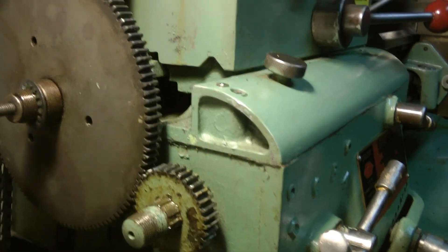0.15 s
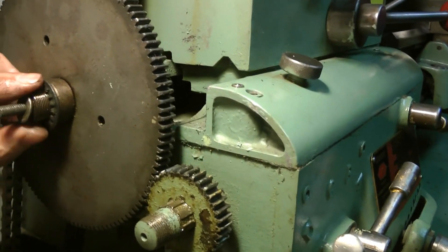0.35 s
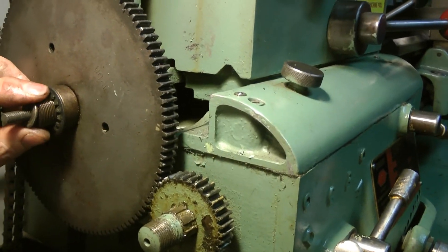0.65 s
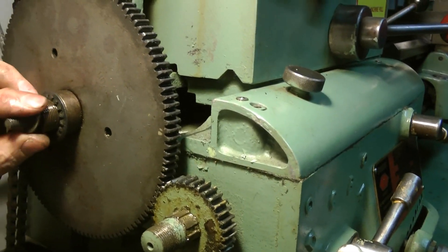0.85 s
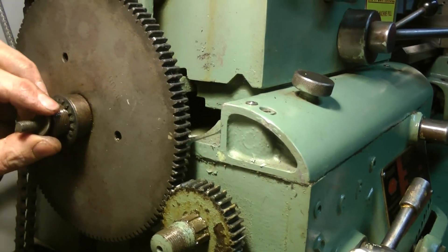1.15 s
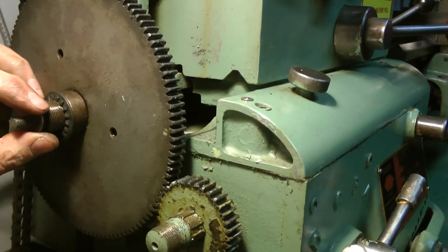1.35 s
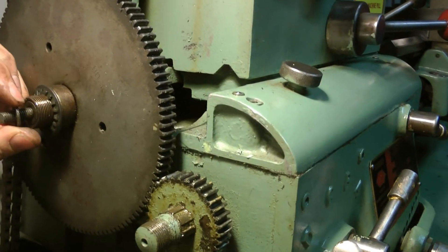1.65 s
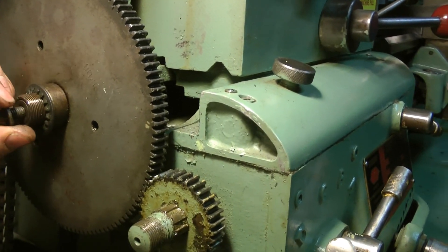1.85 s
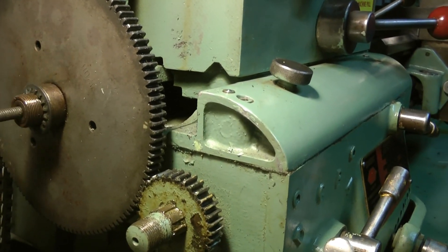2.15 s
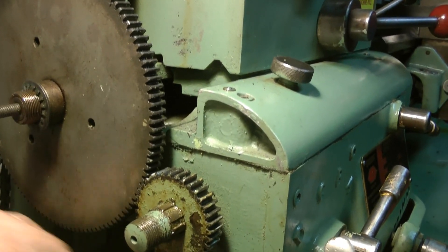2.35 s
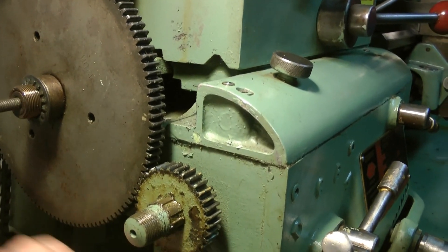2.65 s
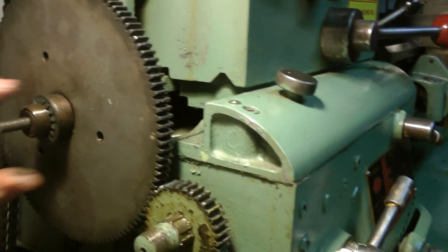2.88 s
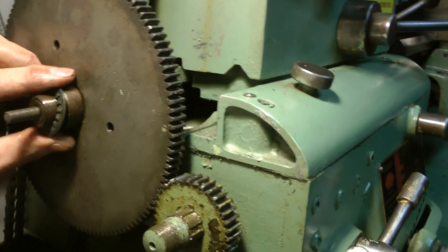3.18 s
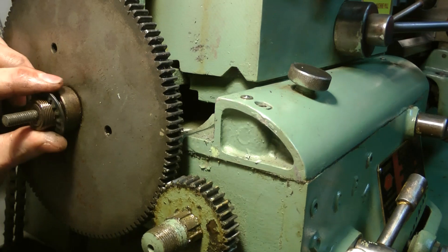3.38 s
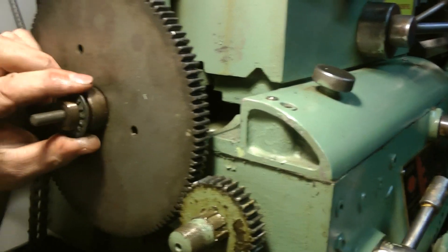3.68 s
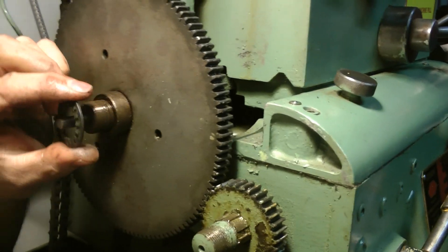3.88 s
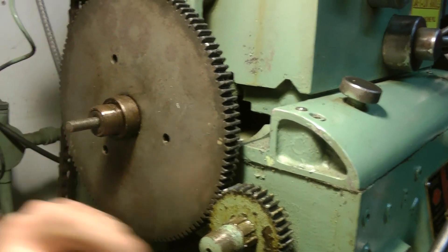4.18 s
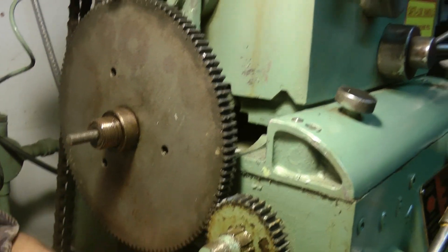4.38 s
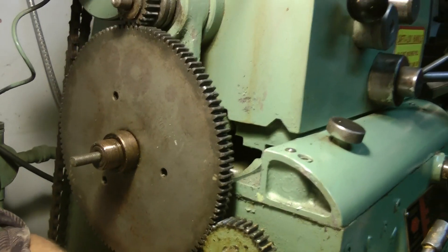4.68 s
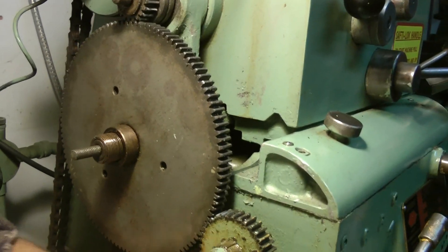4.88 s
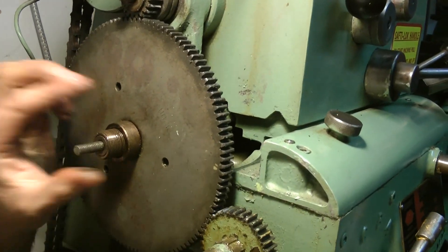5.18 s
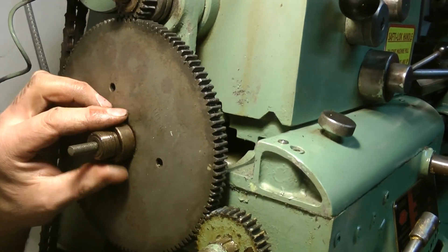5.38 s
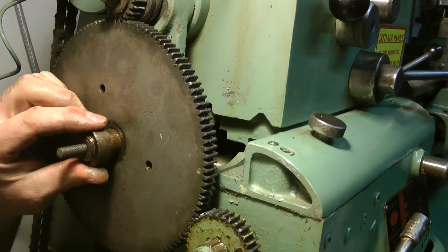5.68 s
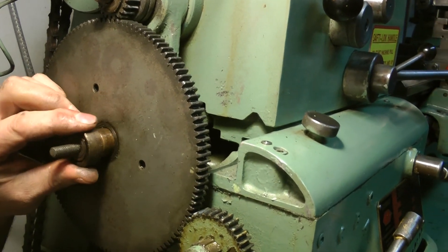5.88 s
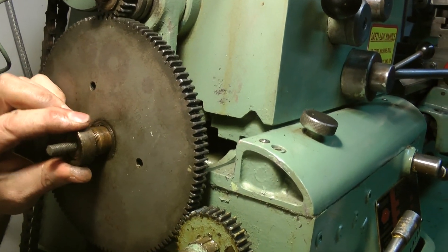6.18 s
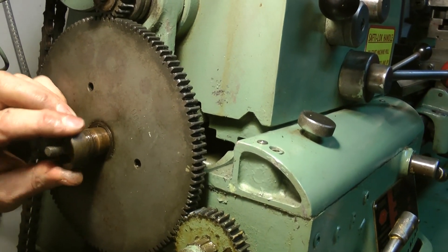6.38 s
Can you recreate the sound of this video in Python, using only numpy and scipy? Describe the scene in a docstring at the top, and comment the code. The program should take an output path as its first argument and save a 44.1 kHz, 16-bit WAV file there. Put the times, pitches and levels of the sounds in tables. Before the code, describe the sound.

A close stereo microphone, fuller on the right, hears metal handling in a small quiet workshop with short echoes and soft background hiss, slightly stronger from about 2.5 to 5.5 s. A crisp tick opens, then near quiet until a small click at 0.85 s. Dry clicks cluster at 1.6-1.7 and 2.0-2.1 s; a thuddy tap at 2.35 s leads to a bright, very high double clink at 2.7 s. From 3.0 to 3.8 s, irregular ticks and scratchy thread chatter. At 4.37 s a part lands with a low thump and mellow ring; sleeves brush and a low hum briefly swells around 4.6 s. A ring pings clearly at 4.74 s, with short clinks to 5.0 s. Light touches follow, then a loud harsh scrape at 5.65-5.8 s and heavy, dull metallic knocks at 5.85, 5.95, 6.05, 6.3 and 6.43 s, the wheel ringing faintly until the end at about 6.5 s.

```python
"""Metal ticks and scrapes as fingers work a nut, washer, lock ring and bush off the stud of a big gear wheel.
Ticks and scrapes are shaped noise bursts with hub modes; set-down parts and the wheel ring as decaying modes.
The machine body thuds in modes and filtered noise; uneven noise grains make the brush of skin and sleeves
and one loud scraping rub. A wavering low hum comes and goes over soft background noise; a small quiet
workshop adds noise-tail echoes. All is near a stereo microphone that favours its right side."""
import sys
import numpy as np
from scipy import signal
from scipy.fft import rfft, irfft
from scipy.io import wavfile
from scipy.ndimage import uniform_filter1d

SR = 44100
rng = np.random.default_rng(int(sys.argv[2]) if len(sys.argv) > 2 else 0)


def dump(signal):
    """Clip the signal to [-1, 1] and save it as 16-bit WAV at the path in sys.argv[1]."""
    limited = np.clip(np.atleast_2d(signal).T, -1, 1)
    pcm = np.round(limited * 32767).astype(np.int16)
    wavfile.write(sys.argv[1], SR, pcm)


N = 288425


def undb(db):
    """Decibels to amplitude gain."""
    return 10 ** (np.asarray(db) / 20)


def curve(table):
    """Join rows (time [s], value) by straight lines, one value per sample."""
    return np.interp(np.arange(N) / SR, *np.transpose(table))


def colour(x, table):
    """Filter by (frequency [Hz], gain [dB]) points, straight over log frequency."""
    hz, db = np.transpose(table)
    size = x.shape[-1]
    f_hz = np.maximum(np.arange(size // 2 + 1) * SR / size, 1)
    gain_db = np.interp(np.log(f_hz), np.log(hz), db)
    return irfft(rfft(x) * undb(gain_db), size)


def unit(x):
    """Scale to rms 1."""
    return x / np.sqrt(np.mean(x ** 2))


def add(track, time_s, sound):
    """Mix a sound into the track from time_s."""
    i = int(time_s * SR)
    track[i:i + len(sound)] += sound[:N - i]


def ring(modes, size, scatter_db, detune):
    """Decaying modes; every blow lands elsewhere, so strengths and pitches shift a little."""
    hz, db, t60_s = np.transpose(modes)[:, :, None]
    pitch_chance, level_chance = rng.standard_normal((len(modes), 2)).T[:, :, None]
    t = np.arange(size) / SR
    swing = np.sin(2 * np.pi * hz * (1 + detune * pitch_chance) * t)
    level_db = db + scatter_db * level_chance - 60 * t / np.abs(t60_s)
    return np.sum(undb(level_db) * swing, axis=0)


def contact(size, lead, rise_s, fall_s):
    """A rough touch: noise that builds up to sample `lead` and dies away."""
    t = (np.arange(size) - lead) / SR
    shape = np.exp(np.where(t < 0, t / abs(rise_s), -t / abs(fall_s)))
    return rng.standard_normal(size) * shape


# room decay: (frequency [Hz], t60 [s])
ROOM_DECAY = [(150, .35), (400, .33), (1000, .3), (2000, .25), (3500, .23), (6500, .2), (12000, .13)]


def room(x, wet_db=-6, gap_s=0.0018, size=8192):
    """Dense echoes, unrelated left and right, treble dying first; the noise tail is redrawn every `size` samples."""
    t, out = np.arange(SR // 2) / SR, np.zeros((2, N))
    for start in range(0, N, size):
        tail = 0
        for k, (hz, t60_s) in enumerate(ROOM_DECAY):
            band = [(f_hz, -12 * (j - k) ** 2) for j, (f_hz, _) in enumerate(ROOM_DECAY)]
            noise = unit(colour(rng.standard_normal((2, len(t))), band))
            tail = tail + noise * np.sqrt(hz) * undb(-60 * t / t60_s)
        # silent for half of gap_s, full after one and a half
        tail = tail * np.clip(t / gap_s - .5, 0, 1)
        tail = tail * undb(wet_db) / np.sqrt(np.mean(np.sum(tail ** 2, axis=1)))
        echoes = signal.fftconvolve(x[None, start:start + size], tail, axes=1)
        for track, echo in zip(out, echoes):
            add(track, (start + .5) / SR, echo)  # half a sample guards the rounding
    return out


# slow swell of the background, before the side balance: (time [s], level [dB])
BACKGROUND_LEVEL = [(0, -55.5), (.7, -57.5), (1.5, -56), (2.5, -52), (3.5, -49.5), (4.4, -49.5), (5, -48.5),
                    (5.6, -51), (6, -50.5), (6.54, -57)]
# background spectral density: (frequency [Hz], relative level [dB per Hz])
BACKGROUND_SPECTRUM = [(15, -44), (25, -4.5), (92, 2.5), (321, -2.5), (483, -9), (617, -7.5), (746, -6),
                       (979, -18.5), (1830, -16.5), (3230, -16.5), (8600, -20.5), (13600, -21),
                       (15200, -14.5), (16500, -38)]


def background():
    """Room murmur and hiss as stereo noise; only the deep bass is nearly alike left and right."""
    mid, side = rng.standard_normal((2, N))
    side = colour(side, [(60, -12), (200, 1.5), (400, 0.5)])
    noise = colour(np.array([mid + side, mid - side]), BACKGROUND_SPECTRUM)
    balance_db = np.array([[-2.2], [1.7]])
    return unit(noise) * undb(curve(BACKGROUND_LEVEL) + balance_db)


# hum coming and going, before the side balance: (time [s], rms level [dB])
HUM_LEVEL = [(0, -60), (.15, -54), (.4, -72), (2.3, -76), (2.4, -56), (2.6, -69), (4.5, -83), (4.62, -47),
             (4.85, -58.5), (5.2, -57), (5.35, -65), (6.54, -56.5)]
HUM_HZ, HUM_DRIFT_RMS_HZ = 137, 4.1


def hum():
    """A low sine whose frequency wavers slightly with smoothed noise."""
    drift = unit(uniform_filter1d(rng.standard_normal(N), size=SR // 8))
    phase = np.cumsum(2 * np.pi * (HUM_HZ + HUM_DRIFT_RMS_HZ * drift) / SR)
    return np.sqrt(2) * np.sin(phase) * undb(curve(HUM_LEVEL))


# skin and sleeves brushing past metal; near 5.72 s the loud rub of a scrape;
# before the side balance: (time [s], level [dB])
BRUSH_LEVEL = [(0, -43), (.1, -60.5), (.3, -60.5), (.45, -52), (.62, -62.5), (1.3, -61), (1.42, -55.5),
               (2.2, -60.5), (2.55, -53), (3.5, -52.5), (4.25, -54.5), (4.58, -41), (5.05, -51.5),
               (5.1, -44), (5.48, -59), (5.72, -27.5), (5.84, -54.5), (6.54, -90)]
# brushing spectral density: (frequency [Hz], relative level [dB per Hz])
BRUSH_SPECTRUM = [(600, -45), (1200, -14), (1800, 0), (5200, -3), (7500, -10), (16000, -24)]


def brushing(grain_db=2.5, likeness=0.21):
    """Brushes and a rub as dense tiny slips of uneven size, partly shared between left and right."""
    slips = rng.standard_normal((3, N)) * undb(grain_db * rng.exponential(size=N).clip(0, 5))
    like = np.clip(likeness, 0, 1)
    pair = np.sqrt(like) * slips[0] + np.sqrt(1 - like) * slips[1:]
    balance_db = np.array([[-3.4], [2.6]])
    return unit(colour(pair, BRUSH_SPECTRUM)) * undb(curve(BRUSH_LEVEL) + balance_db)


# machine body and bench modes: (frequency [Hz], level [dB], t60 [s])
BODY_MODES = [(132, -6, .3), (180, 0, .3), (270, -1, .3), (370, -1, .12), (450, -3, .1), (590, -3, .09),
              (760, -4, .08), (840, -4, .08), (1090, -6, .07)]
# thuds, before the side balance: (time [s], peak level [dB], frequency driven hardest [Hz])
BODY_THUDS = [(1.702, -43.5, 405), (2.34, -31.5, 387), (2.342, -31, 770), (3.499, -41.5, 489),
              (3.62, -37, 610), (3.761, -34, 494), (4.347, -34, 272), (4.372, -26, 200.7),
              (4.514, -35, 740), (4.62, -42, 230), (5.074, -34, 631), (5.307, -41.5, 204),
              (5.572, -25, 284), (5.575, -41, 795), (5.623, -28.5, 216), (5.72, -25, 730),
              (5.857, -33, 446), (5.943, -33, 562), (6.051, -26.5, 553), (6.291, -32, 330),
              (6.43, -23.5, 635)]


def thuds(fall_db_per_oct=9, shudder_db=19, shudder_s=.016):
    """A push drives the modes near its own pitch hardest; loose panels shudder with it."""
    out, size = np.zeros(N), SR // 2
    for time_s, peak_db, push_hz in BODY_THUDS:
        modes = [(hz, db - fall_db_per_oct * abs(np.log2(hz / push_hz)), t60_s)
                 for hz, db, t60_s in BODY_MODES]
        band = [(push_hz / 3, -40), (push_hz / 1.4, 0), (push_hz * 1.6, 0), (push_hz * 4, -30)]
        panels = colour(contact(size, 100, .001, shudder_s), band)
        thud = ring(modes, size=size, scatter_db=1.0, detune=0.032) + undb(shudder_db) * panels
        thud = colour(thud, [(50, -20), (120, 0)])
        add(out, time_s, undb(peak_db) * thud / np.abs(thud).max())
    return out


# long gear wheel modes, rim mode last: (frequency [Hz], level [dB], free t60 [s])
WHEEL_MODES = [(225, 0, .8), (1696, -3, .3), (6503, 0, .9)]
# blows that reach the wheel: (time [s], level [dB], extra rim mode level [dB])
WHEEL_HITS = [(0.856, -63.5, 6.5), (1.62, -58, 4.5), (1.702, -65, 11.5), (2.094, -56.5, -5),
              (5.629, -39.5, -16), (5.854, -44, -20), (5.944, -51, 4), (6.053, -47, 7), (6.291, -43, -3),
              (6.441, -35.5, -3)]
HAND_ON_WHEEL_S = 5.55


def wheel(held_share=0.34):
    """The heavy wheel rings on faintly; a hand on it shortens the rim mode."""
    out = np.zeros(N)
    hz, own_db, t60_s = WHEEL_MODES[-1]
    for time_s, db, rim_db in WHEEL_HITS:
        share = held_share if time_s > HAND_ON_WHEEL_S else 1
        rim = (hz, own_db + rim_db, t60_s * share)
        sound = ring(WHEEL_MODES[:-1] + [rim], size=SR, scatter_db=1.5, detune=.0004)
        add(out, time_s, undb(db) * sound)
    return out


def struck(modes, blows):
    """A loose part rings in its modes until a finger or the bench stops it."""
    out, t = np.zeros(N), np.arange(SR // 2) / SR
    for time_s, db, free_s in blows:
        held = np.exp(-np.maximum(t - free_s, 0) / 0.0054)
        sound = ring(modes, size=len(t), scatter_db=1, detune=.0002)
        add(out, time_s, undb(db) * held * sound)
    return out


# loose part modes: (frequency [Hz], level [dB], free t60 [s])
NUT_MODES = [(7526, -12, .1), (7900, -8, .11), (8130, -4, .13), (8258, 0, .15), (8390, -5, .12),
             (8700, -11, .08)]
COLLAR_MODES = [(1691, 0, .6)]
WASHER_MODES = [(3840, 0, .3)]
LOCK_RING_MODES = [(3546, 0, .55), (3566, -4, .45), (7267, -10, .12), (9776, -4, .35), (9815, -11, .3),
                   (10380, -7, .1)]
# loose part blows: (time [s], level [dB], free ringing time [s])
NUT_HITS = [(2.702, -23, .3), (2.7105, -21.5, .3)]
COLLAR_HITS = [(4.375, -26.5, 0.142)]
WASHER_HITS = [(3.852, -43, 0.075), (4.376, -34.5, 0.056), (5.274, -47.5, 0.086)]
LOCK_RING_HITS = [(4.7385, -23.5, 0.2), (4.885, -28, 0.038), (4.923, -41, 0.048), (5.008, -45.5, 0.037)]


def loose_parts():
    """Nut, collar, washer and lock ring, each ringing in its own modes when set down."""
    return (struck(NUT_MODES, NUT_HITS) + struck(COLLAR_MODES, COLLAR_HITS)
            + struck(WASHER_MODES, WASHER_HITS) + struck(LOCK_RING_MODES, LOCK_RING_HITS))


# single touches on the stud, before trim: (time [s], mids [dB], treble above mids [dB])
SINGLE_TICKS = [(.0547, -24, 1.5), (0.23, -46, -12), (0.84, -41, -21), (0.8585, -32.5, 5.5),
                (1.6195, -24.5, -13.5), (1.6272, -28.5, -32), (1.6813, -25, -21), (1.7015, -21, -9),
                (1.7137, -29, 3.5), (1.8795, -35, -12), (1.9102, -31, -20), (2.0227, -26, -20),
                (2.0735, -29, -16), (2.0832, -26, -26), (2.095, -27.5, -16), (2.112, -26.5, -12),
                (2.339, -23.5, -16), (2.348, -25, -5), (2.6229, -29, 17), (2.639, -35.5, 16),
                (2.6491, -27.5, 4), (2.701, -27.5, 14), (3.0208, -33, -1), (3.042, -21.5, -4),
                (3.29, -32.5, -4), (3.2976, -22.5, -3), (3.321, -30.5, 6), (3.325, -34, -5),
                (3.3947, -34.5, 1), (3.416, -26, -9), (3.4967, -23.5, -10), (3.5034, -20, -9),
                (3.531, -40, -30), (3.6011, -24, -11), (3.6397, -32.5, -7), (3.684, -42, 1),
                (3.7584, -22, -14), (3.7951, -26, -2), (4.344, -32, 10.5), (4.3724, -16.5, -57),
                (4.376, -40, 29), (4.5156, -26.5, -18), (4.7392, -26.5, 13), (4.8738, -33.5, 7),
                (4.8844, -31, 11.5), (4.9231, -32, 12.5), (5.005, -35, -7), (5.075, -31, -4),
                (5.306, -37.5, 1.5), (5.5606, -40, -3.5), (5.5884, -50, 32), (5.619, -32.5, 7),
                (5.675, -14, -6.5), (5.6828, -10.5, -2), (5.7085, -21, -26), (5.718, -12, -16),
                (5.7272, -17, -24), (5.7392, -9.5, -12.5), (5.779, -19.5, -44), (5.8528, -10, -20),
                (5.863, -10.5, -20.5), (5.9435, -13, -21), (5.9695, -24, -33), (6.0475, -3, -26),
                (6.0563, -13.5, -12.5), (6.2892, -14, -15), (6.425, -7, -23), (6.4339, -7.5, -34),
                (6.4438, -7, -23.5), (6.4664, -17, -26), (6.493, -31, -15), (6.5248, -17.5, -22)]
# a part slides along the thread and chatters, or (near 4.82 s) the set-down lock ring wobbles, before trim and
# scatter: (start [s], length [s], mids [dB], treble above mids [dB], lift of upper mids [dB])
CHATTER_RUNS = [(0.057, 0.044, -57.5, 13, 13.5), (1.688, 0.013, -30, -15, -4), (2.01, .012, -38, -31, -6),
                (2.069, 0.052, -36, -14, 10.5), (3.4, .014, -35, -10, 8), (3.611, 0.046, -30.5, -5, -2),
                (3.776, 0.014, -24.5, -11, 0), (4.064, 0.022, -33, -20, -1.5), (4.325, .018, -41, -8, 4),
                (4.815, .058, -44.5, -2, 1), (5.571, .065, -50, -5, 19.5), (5.644, 0.025, -27, -25, -4),
                (5.684, 0.063, -19.5, -19, 1.5), (5.777, 0.023, -40, -27, 1.5)]
TICK_UPPER_LIFT_DB = 1  # upper mids above the slope from mids to treble
CHATTER_GAP_S, CHATTER_SCATTER_DB, CHATTER_TILT_SCATTER_DB = .006, 4, 3


def touches():
    """Single ticks and uneven chatter runs as (time [s], mids [dB], upper mids [dB], treble [dB])."""
    rows = [(time_s, db, tilt_db, TICK_UPPER_LIFT_DB) for time_s, db, tilt_db in SINGLE_TICKS]
    for start_s, length_s, db, tilt_db, lift_db in CHATTER_RUNS:
        place, size, tone = rng.standard_normal((12, 3)).T
        after_s = CHATTER_GAP_S * (np.arange(len(place)) + .25 * place.clip(-2, 2))
        mids_db = db + CHATTER_SCATTER_DB * size
        tilts_db = tilt_db + CHATTER_TILT_SCATTER_DB * tone
        run = zip(start_s + after_s, mids_db, tilts_db)
        rows += [(*row, lift_db) for row in run if row[0] < start_s + length_s]
    return [(time_s, db, db + tilt_db / 2 + lift_db, db + tilt_db)
            for time_s, db, tilt_db, lift_db in rows]


# mids (low edge for soft touches), upper mids, treble: (low edge [Hz], high edge [Hz])
TICK_BANDS = ((1750, 3700), (4200, 7200), (7200, 16000))
# short modes of stud, hub and bush, damped by the fingers: (frequency [Hz], level [dB], t60 [s])
HUB_MODES = [(1500, -9, .025), (1720, -2, .03), (1840, 0, .03), (2000, -4, .025), (2230, -3, .025),
             (2600, -6, .025), (2860, -1, .03), (3050, -2, .03), (3250, 0, .03), (3600, -6, .02),
             (4300, -8, .015), (5450, -7, .015), (5950, -6, .015)]


def ticks(rise_s=0.00056, fall_s=0.0016, snap_db=6, hub_db=-26, top_db=-2, deepen_oct_per_db=.017,
          casting_db=-16, casting_s=0.024, trim_db=-4.0):
    """Each touch is heard directly, rings the hub, and fades in the dense modes of the castings."""
    out, size, lead = np.zeros(N), 4096, 512
    for time_s, *levels_db in touches():
        mids_db, _, treble_db = levels_db
        # dull touches are slower; quick ones open with a stronger snap
        slow = 2 ** np.clip((mids_db - treble_db) / 12, -1.5, 1.3)
        touch = contact(size, lead, rise_s * slow, fall_s * np.sqrt(slow))
        touch[lead] += undb(snap_db) / slow
        # quick touches glance off and move the hub less
        hub_ring = ring(HUB_MODES, size=size, scatter_db=3, detune=0.035)
        hub = signal.fftconvolve(touch, hub_ring)[:size] * min(slow, 1)
        # castings: weaker treble
        casting = colour(contact(size, lead, rise_s * slow, casting_s), [(6000, 0), (11000, -8)])
        sound = touch + undb(hub_db) * hub + undb(casting_db) * casting
        sound = colour(sound, [(9000, 0), (16000, top_db)])
        # hard blows reach deeper modes
        (low_hz, high_hz), *upper = TICK_BANDS
        low_hz = low_hz / 2 ** (deepen_oct_per_db * max(mids_db + 28, 0))
        for (lo, hi), db in zip([(low_hz, high_hz), *upper], levels_db):
            edges = [(lo / 5, -45), (lo / 1.4, -19), (lo, 0), (hi, 0), (hi * 1.15, -25), (hi * 1.6, -55)]
            band = colour(sound, edges)
            peak = np.sqrt(2 * uniform_filter1d(band ** 2, size=66).max())  # from 1.5 ms rms
            add(out, time_s - lead / SR, undb(db + trim_db) * band / peak)
    return out


def scene():
    """Sum all sources and echoes; the microphone picks up more on its right side."""
    parts = loose_parts() + wheel()
    knocks = ticks() + thuds()
    echoes = room(knocks + undb(-12) * parts) * undb([[-3.6], [2.6]])
    direct = (knocks + parts + hum()) * undb([[-3.5], [2.5]])
    return direct + echoes + brushing() + background()


def record(dry):
    """The small microphone drops the deepest bass; the recorder rounds the highest peaks and cuts the top."""
    bass_cut = signal.butter(2, 35, "high", fs=SR, output="sos")
    top_cut = signal.ellip(8, .2, 70, 16000, fs=SR, output="sos")
    dry = signal.sosfilt(bass_cut, dry)
    rounded = .9 * np.tanh(dry / .9)
    return signal.sosfilt(top_cut, rounded)


dry = scene()
out = record(dry)
dump(out)
```